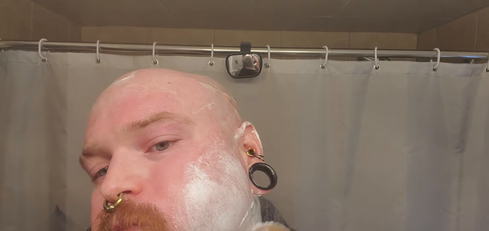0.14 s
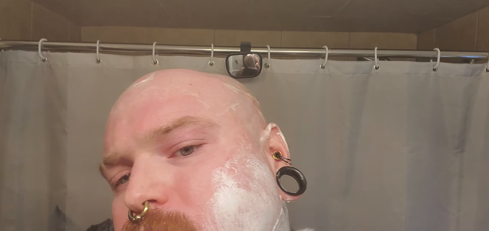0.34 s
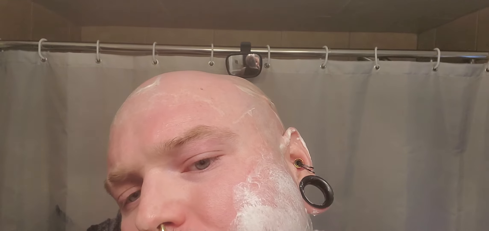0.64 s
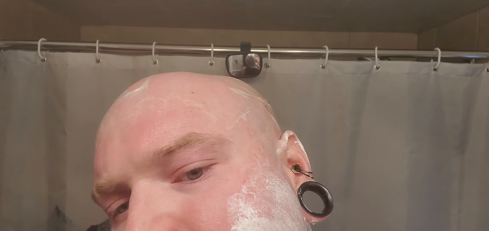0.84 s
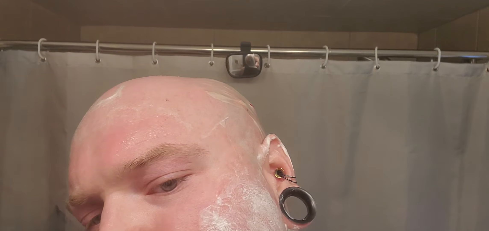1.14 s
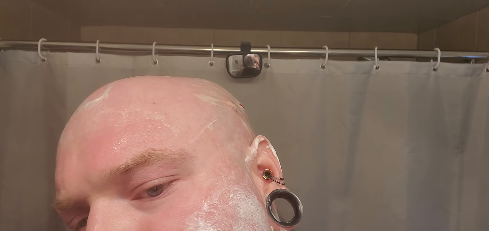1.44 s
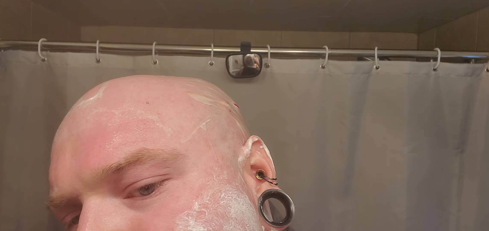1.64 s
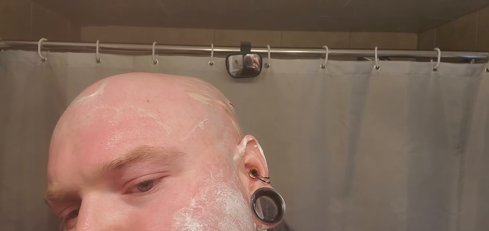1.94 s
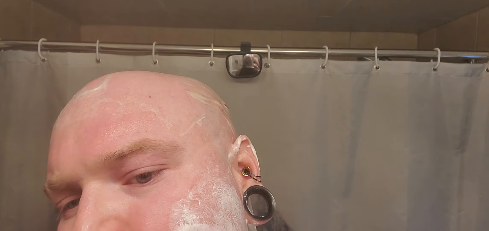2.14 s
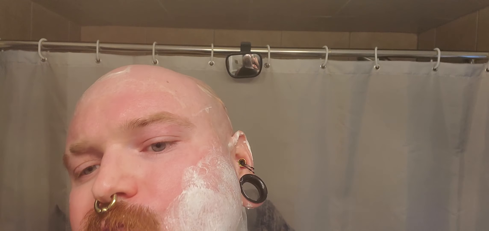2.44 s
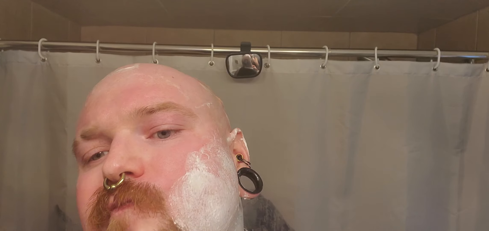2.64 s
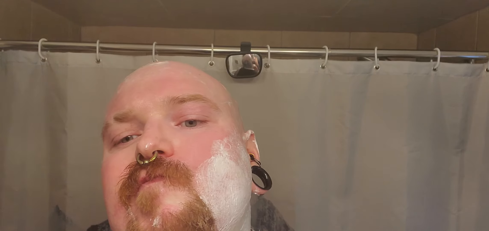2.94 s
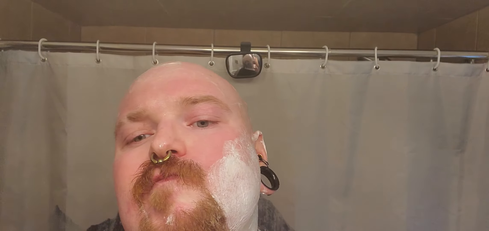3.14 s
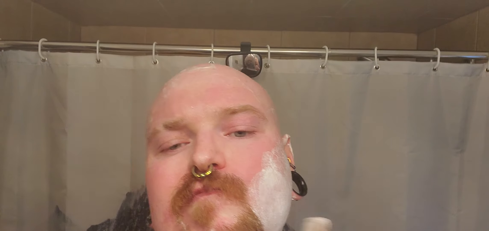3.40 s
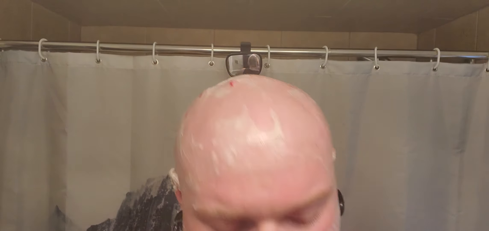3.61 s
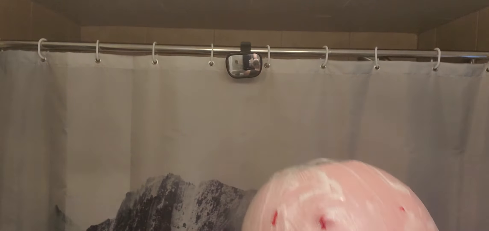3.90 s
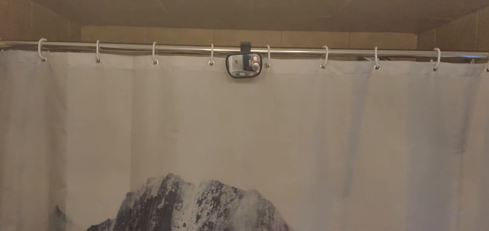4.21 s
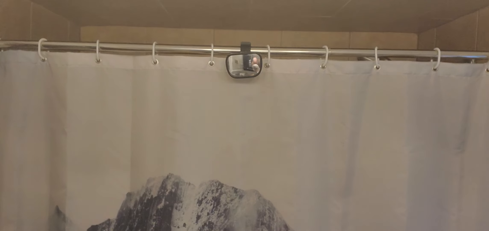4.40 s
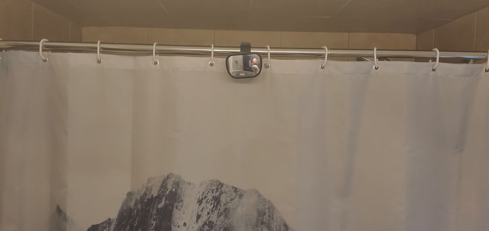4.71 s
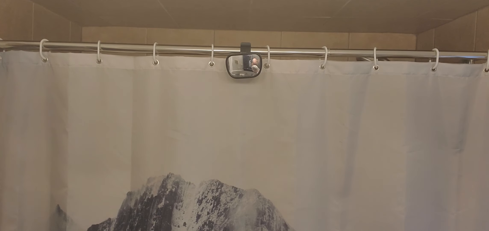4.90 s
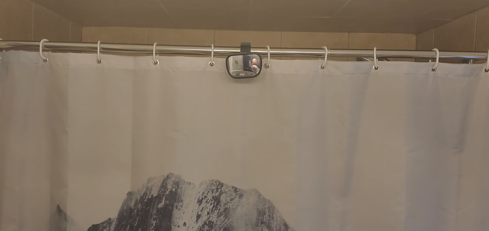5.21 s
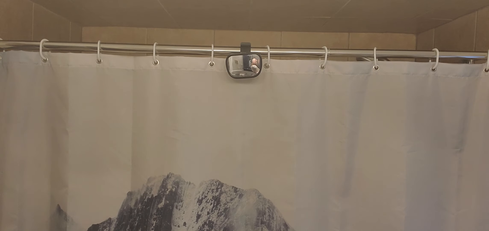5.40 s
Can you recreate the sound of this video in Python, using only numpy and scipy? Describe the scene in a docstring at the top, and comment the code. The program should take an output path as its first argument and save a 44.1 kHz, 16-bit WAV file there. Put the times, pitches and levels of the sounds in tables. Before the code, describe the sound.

Steady shower spray fills a small tiled bathroom, bright and hissy with fine droplet patter. Two bubbly drips plop just after the start. Three hard hollow knocks on the basin come near the middle, later a brief rattling clack. Faint deep floor thuds come from shifting feet. Close stereo microphone, short hard wall echo.

```python
"""Steady water spray in a small tiled bathroom, hard knocks on the basin, two larger drops, floor booms.
Two microphone ports a few centimetres apart hear it. Spray: shaped noise plus short droplet ticks,
coloured by resonances of tub and room. Knocks: contact noise ringing basin modes. Drops: sines rising
in pitch. Floor: low room modes, rung by lumpy noise or sounded in bursts under shifting feet.
Knocks and drops echo off the walls."""
import sys
import numpy as np
from scipy import signal
from scipy.fft import rfft, irfft, next_fast_len
from scipy.io import wavfile
from scipy.ndimage import uniform_filter1d

SR = 44100
rng = np.random.default_rng(int(sys.argv[2]) if len(sys.argv) > 2 else 0)


def waveform_to_disk(signal):
    """Save audio, clipped to [-1, 1], as 16-bit WAV at the path in sys.argv[1]."""
    frames = np.transpose(np.atleast_2d(signal))
    scaled = np.clip(frames, -1, 1) * 32767
    samples = np.round(scaled).astype(np.int16)
    wavfile.write(sys.argv[1], SR, samples)


N = 244755
EDGE_HZ = 15760  # upper band limit

# unevenness of the reverberant field: f/Hz, fixed ripple/dB rms, wandering ridges/dB rms
UNEVENNESS = [(300, 2.2, 2.3), (1500, 2.3, 2.3), (5000, 1.4, 2.1), (12000, .7, 1.2)]


def amp(db):
    """Amplitude ratio of a level in dB."""
    return 10 ** (np.asarray(db) / 20)


def evened(x):
    """Scale to unit rms over all channels."""
    return x / np.sqrt(np.mean(x ** 2) + 1e-20)


def smooth_noise(shape, *size_axis):
    """Unit-rms noise smoothed by moving averages, each given as (size, axis)."""
    x = rng.standard_normal(shape)
    for size, axis in size_axis:
        x = uniform_filter1d(x, size=size, axis=axis)
    return evened(x)


def read(points, hz):
    """Every column of a table, joined by straight lines over log frequency."""
    f, *columns = np.transpose(points)
    return np.array([np.interp(np.log(hz + 1), np.log(f + 1), c) for c in columns])


def add(mix, start_s, sound):
    """Mix a sound in at its start time, cut at the end of the mix."""
    part = mix[..., round(start_s * SR):][..., :sound.shape[-1]]
    part += sound[..., :part.shape[-1]]


def ring(modes, shade_db, size):
    """Sum of dying sines, each mode raised or lowered by its own shade."""
    t = np.arange(size) / SR
    out = 0
    for (hz, db, t60_s), extra_db in zip(modes, shade_db * np.ones(len(modes))):
        out = out + amp(db + extra_db - 60 * t / t60_s) * np.sin(2 * np.pi * hz * t)
    return out


def spray():
    """One stream reaches both ports with a lag, two reach one port each; colour and resonances follow."""
    # spray strength: t/s, level/dB before swell scaling and output gain
    flow = [(0, -33.5), (.5, -34), (.64, -33), (2.15, -33.5), (2.76, -32.5), (2.81, -33.5), (3.07, -32),
            (3.29, -34), (3.48, -32), (3.54, -35), (3.6, -33), (5.55, -33.5)]
    # broad colour at each port: f/Hz, left/dB, right/dB
    colour = [(130, -22.6, -22.8), (200, -26.0, -27.3), (330, -19.7, -20.1), (560, -27.2, -29.1),
              (1000, -22.0, -25.9), (1400, -17.6, -13.0), (2700, -14.0, -11.8), (4000, -5.2, -4.2),
              (5200, -2.4, -3.6), (6300, -6.6, -7.2), (7800, -9.1, -12.5), (9000, -16.3, -17.8),
              (11000, -11.5, -14.3), (15600, -12.1, -5.6)]
    # resonances of tub and room, added to the colour: f/Hz, width/Hz, left/dB, right/dB
    resonances = [(281, 50, 3.7, 4.7), (412, 30, 14.8, 11.5), (784, 168, 6.3, 12.0), (1146, 78, 3.9, 6.5),
                  (1364, 66, 3.7, 5.8), (1445, 193, 8.8, 2.3), (1884, 152, 6.6, 4.3),
                  (2003, 119, 3.3, -2.2), (2381, 103, 8.2, 7.1), (2577, 56, 5.7, 2.0),
                  (2918, 239, 5.3, 5.9), (3078, 113, 7.9, 4.1), (3301, 171, 5.1, 3.4), (3837, 38, 2.3, 4.7),
                  (3955, 58, 1.0, 6.0), (4117, 28, 2.1, 2.9), (4446, 73, 4.6, 4.5), (4567, 102, 1.2, 6.6),
                  (4701, 36, 2.4, -1.1), (4908, 156, 6.4, 5.3), (5034, 153, 1.8, 4.5),
                  (5584, 359, 3.4, 4.1), (5905, 108, 4.9, 3.8), (6497, 112, 3.0, -0.3),
                  (6878, 245, 3.0, 3.9), (7982, 899, -5.6, 6.5), (9707, 100, 2.0, -0.4),
                  (10036, 150, -2.9, -2.4), (11777, 194, 1.2, 3.3), (14259, 899, 1.2, -2.0)]
    # stream common to both ports, right port nearer to the water: f/Hz, power share/0-1, left lag/rad
    common = [(100, 0.74, 0.62), (380, 1, 0.39), (1030, 0.79, 1.5), (2470, 0.58, 1.79), (3270, 0, 2.8),
              (4330, 0.38, 4.05), (4950, 0.54, 3.45), (5900, 0.48, 5.9), (6550, 0.3, 8.9), (7470, 0, 11),
              (8100, 0.7, 11.1), (9900, 0.18, 12.8), (15000, 0.36, 10.4)]
    droplets_db = -11.5  # against the hiss
    fizz_from_hz = 7000

    size = next_fast_len(N)
    hz = np.fft.rfftfreq(size, 1 / SR)
    streams = hiss(patch_db=1.59, splash_db=0.35) + amp(droplets_db) * droplets()
    both, left, right = rfft(wander(streams), size)

    share, lag_rad = read(common, hz)
    share = np.clip(share, 0, 1)
    lagged = both * np.exp(-1j * lag_rad * [[1], [0]])
    ports = np.sqrt(share) * lagged + np.sqrt(1 - share) * np.array([left, right])

    low_cut_db = 14 * np.log2(np.maximum(100 / (hz + 1), 1))  # 14 dB/octave below 100 Hz
    colour_db = read(colour, hz) - low_cut_db
    for f, width_hz, *db in resonances:
        colour_db = colour_db + np.array(db)[:, None] / (1 + (2 * (hz - f) / width_hz) ** 2)
    ripple = smooth_noise(colour_db.shape, (130, 1))  # many small standing waves
    colour_db = colour_db + read(UNEVENNESS, hz)[0] * ripple
    coloured = ports * amp(colour_db) * (hz < EDGE_HZ)

    body = irfft(coloured * (hz < fizz_from_hz), size)[:, :N]
    fizz = irfft(coloured * (hz >= fizz_from_hz), size)[:, :N]
    level_db = np.interp(np.arange(N) / SR, *np.transpose(flow))
    steady_db = level_db.mean()
    swell_db = level_db - steady_db
    # fine fizz follows the swells less than the body does
    sound = body * amp(1.04 * swell_db) + fizz * amp(0.49 * swell_db)
    return evened(sound) * amp(steady_db + 2.5)


def hiss(patch_db, splash_db):
    """Three white streams sharing drifting patches and quick wide-band splashes."""
    frames = N // 64 + 5
    re, im = rng.standard_normal((2, 3, frames, 129))
    patches = smooth_noise((frames, 129), (28, 0), (3, 1))
    splashes = smooth_noise((frames, 129), (8, 0), (40, 1))
    z = (re + 1j * im) * amp(patch_db * patches + splash_db * splashes)
    return evened(signal.istft(z.transpose(0, 2, 1), nperseg=256, noverlap=192)[1][:, :N])


def droplets():
    """Sparse ticks of uneven size: fast-dying sines at twelve pitches."""
    drops_per_s = 1500  # in each stream
    t, out = np.arange(128) / SR, np.zeros((3, N))
    size_db = 3.6 * np.minimum(rng.exponential(1, (3, N)), 5)
    size = amp(size_db) * (rng.random((3, N)) < drops_per_s / SR)
    kind = rng.integers(0, 12, (3, N))
    for k, hz in enumerate(np.geomspace(700, 15000, num=12)):
        tick = np.sin(2 * np.pi * hz * t) * np.exp(-hz * t / 1.45) * hz
        out += signal.oaconvolve(size * (kind == k), tick[None], axes=1)[:, :N]
    return evened(out)


def wander(x):
    """Narrow ridges come and go as the jets and the body in the room shift the standing waves."""
    hz, _, z = signal.stft(x, SR, nperseg=1024, noverlap=768)
    ridges_db = read(UNEVENNESS, hz)[1][:, None] * smooth_noise(z.shape[1:], (2, 0), (30, 1))
    return signal.istft(z * amp(ridges_db), nperseg=1024, noverlap=768)[1][:, :N]


def knocks():
    """A blow and a short bright rattle ring the basin; modes with a node at the struck spot stay quiet."""
    # basin modes: f/Hz, level/dB, t60/s
    basin = [(330, -18, 0.062), (354, 0.5, 0.055), (404, -13.5, 0.18), (483, 1.5, 0.078), (593, 2, 0.069),
             (650, 2.5, 0.026), (770, 10, 0.065), (826, 1, 0.053), (1132, 6.5, 0.019), (1256, -10, 0.028),
             (1317, 0, 0.049), (1530, -2, 0.06), (1763, 3.5, 0.062), (1910, -4, 0.13), (1960, 2.5, 0.091),
             (2520, -20, 0.03), (3060, -8, 0.028), (3800, -28, 0.014)]
    # knocks: t/s, peak before high-pass/dB, rattle length/s, muted pitch at struck spot f/Hz,
    # hardness as tilt/(dB/octave)
    blows = [(.386, -36, 0.00045, 620, -16), (2.54, -23.5, 0.0003, 490, -7.5),
             (2.742, -17.5, .0003, 395, -4.5), (3.07, -20, .0004, 610, -8), (4.236, -22.5, 0.019, 620, -6),
             (4.255, -25, 0.016, 630, -5.5), (4.272, -29, 0.0044, 656, -12), (4.287, -38.5, .004, 660, -9)]
    node_db, node_octaves = -34, 0.28
    grit_strength, grit_s = 1.03, 0.0036  # rattles long against grit_s are weaker
    # tilt acts between these; above, the snap of the contact keeps the modes level
    tilt_from_hz, tilt_top_hz = 470, 1320

    out, t, hz = np.zeros(N), np.arange(4000) / SR, np.array(basin)[:, 0]
    tilt_octaves = np.log2(np.clip(hz, tilt_from_hz, tilt_top_hz) / tilt_from_hz)
    grits = rng.standard_normal((len(blows), 4000))
    for (start_s, peak_db, length_s, node_hz, tilt_db), grit in zip(blows, grits):
        rattle = np.gradient(grit * (t < length_s) * (1 - .5 * t / length_s))
        contact = grit_strength * np.sqrt(grit_s / (grit_s + length_s)) * rattle
        contact[0] = 1
        node_shade_db = node_db * np.exp(-(np.log2(hz / node_hz) / node_octaves) ** 2)
        shade_db = node_shade_db + tilt_db * tilt_octaves
        blow = signal.fftconvolve(contact, ring(basin, shade_db, size=SR // 3))
        add(out, start_s, amp(peak_db) * blow / abs(blow).max())
    # a small body radiates little bass
    return signal.sosfilt(signal.butter(3, 250, "high", fs=SR, output="sos"), out)


def plops():
    """Large drops into standing water: a trapped bubble rings and rises a little in pitch."""
    # drops: t/s, level before rise and decay/dB, starting pitch f/Hz, t60/s
    bubbles = [(0.521, -29, 1350, 0.041), (0.6, -30, 1243, 0.031)]
    rise_s = 0.00078
    out, t = np.zeros(N), np.arange(6000) / SR
    for start_s, db, hz, t60_s in bubbles:
        envelope = amp(db - 60 * t / t60_s) * (1 - np.exp(-t / rise_s))
        add(out, start_s, envelope * np.sin(2 * np.pi * hz * (t + 1.6 * t ** 2)))
    return out


def walls(x):
    """Echo of tiled walls: sparse random-sign taps, partly common to the ports; lows last longer."""
    t60_s, low_t60_s, low_hz = 0.23, 0.3, 520
    taps = rng.choice([-1., 1.], (3, SR // 2)) * (rng.random((3, SR // 2)) < .05)
    t = np.arange(SR // 2) / SR
    taps = taps[:2] + 1.04 * taps[2]
    low = signal.sosfiltfilt(signal.butter(N=2, Wn=low_hz, fs=SR, output="sos"), taps)
    tail = (taps - low) * amp(-60 * t / t60_s) + low * amp(-60 * t / low_t60_s)
    tail = tail * (t > .006)
    return signal.fftconvolve(x[None], tail / np.linalg.norm(tail[0]), axes=1)[:, :N]


def floor():
    """Lumpy noise rings the low room modes; each weight shift adds a shaped burst at their pitches."""
    # low room modes: f/Hz, level/dB, t60/s (rumble only)
    modes = [(35.4, -7, 0.51), (68.8, 2.5, 0.28), (97, -11, 0.47)]
    # weight shifts, before port gains: t/s, length before fast decay/s, level/dB,
    # sharpness as tilt over the modes/(dB/octave)
    shifts = [(0, 0.022, -51, -11), (.262, .094, -46, 4), (0.621, .13, -50, -3), (.9, 0.099, -49.5, 6),
              (1.249, 0.026, -49, 10), (1.271, 0.12, -37, -4), (1.449, 0.11, -50.5, -2),
              (3.638, 0.12, -57, -15), (4.532, 0.065, -43, 13), (4.579, 0.086, -48.5, -16.5),
              (4.751, 0.091, -50.5, -13), (5.075, 0.082, -53, -10), (5.448, .11, -53.5, -16)]
    rumble_db = -60.5  # rms before port gains
    rise_s, sag_db_per_s, stop_db_per_s = 0.013, 54, 380  # stop adds to sag after the length

    lumps = amp(1.1 * smooth_noise(N, (4000, 0)))
    shaking = lumps * rng.standard_normal(N)
    out = amp(rumble_db) * evened(signal.fftconvolve(shaking, ring(modes, 0, size=SR))[:N])

    t = np.arange(SR // 2) / SR
    phases = rng.random((len(shifts), 3))  # cycles
    for (start_s, length_s, db, tilt_db), phase in zip(shifts, phases):
        decay_db = sag_db_per_s * t + stop_db_per_s * np.maximum(t - length_s, 0)
        shape = (1 - np.exp(-(t / rise_s) ** 2)) * amp(db - decay_db)
        tones = 0
        for p, (hz, mode_db, _) in zip(phase, modes):
            tilted_db = mode_db + tilt_db * np.log2(hz / modes[1][0])
            tones = tones + amp(tilted_db) * np.sin(2 * np.pi * (hz * t + p))
        add(out, start_s, shape * tones)
    return out


def scene():
    """Spray, floor, direct knocks and drops, and the wall echo, as left and right port."""
    lag_s, echo_db = 0.000068, -4  # the basin is nearer to the right port
    hits, drops = knocks(), plops()
    near = np.array([np.roll(hits, round(lag_s * SR)), hits]) + drops * amp([[-3], [2]])
    echo = amp(echo_db) * walls(hits + drops)
    return spray() + floor() * amp([[.5], [-.4]]) + near + echo


def record(dry):
    """Linear-phase low-pass: the band limit of the recorder."""
    lowpass = signal.firwin(1023, EDGE_HZ, window=("kaiser", 9), fs=SR)
    return signal.oaconvolve(dry, lowpass[None], "same")


dry = scene()
out = record(dry)
waveform_to_disk(out)
```